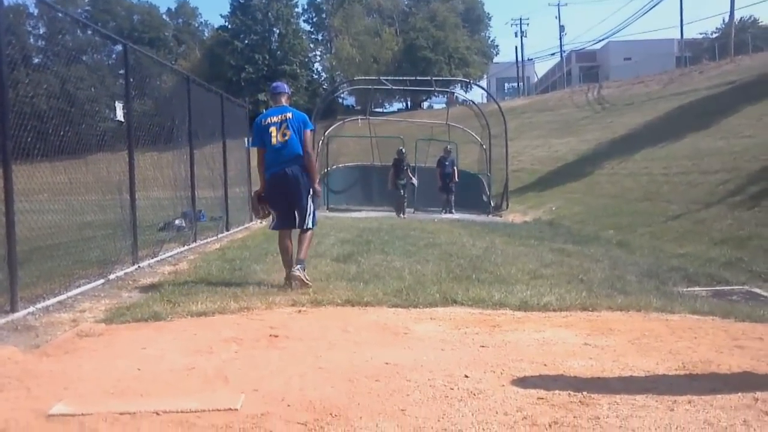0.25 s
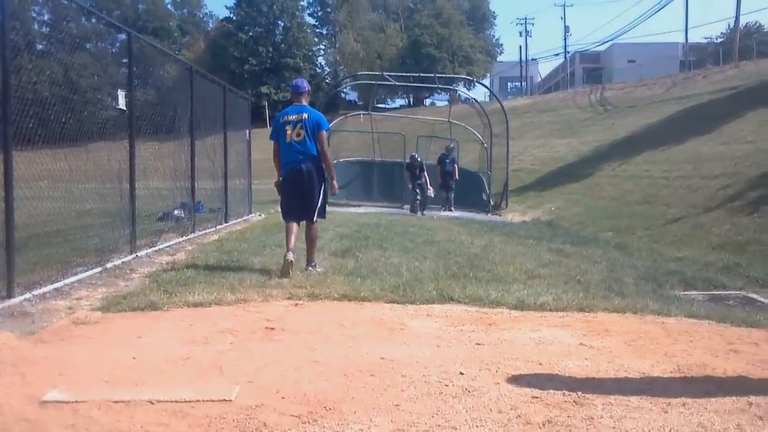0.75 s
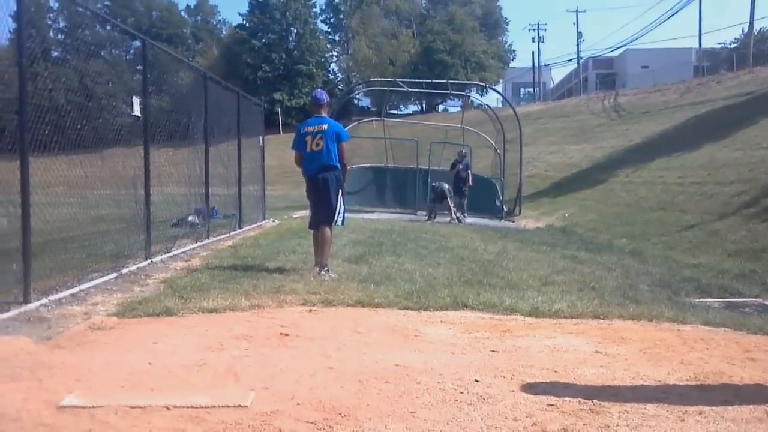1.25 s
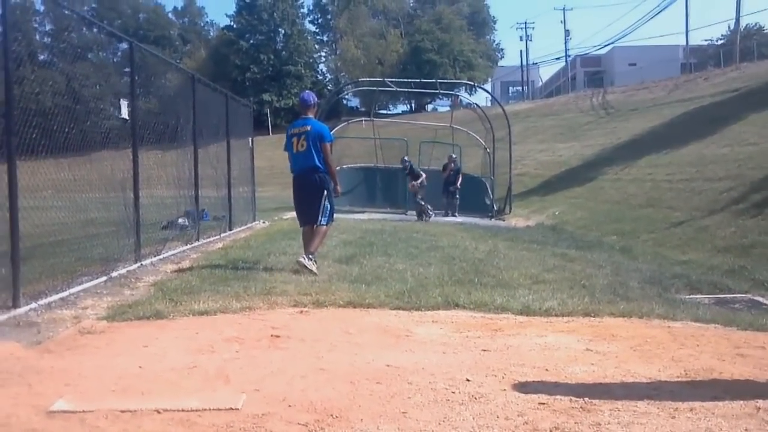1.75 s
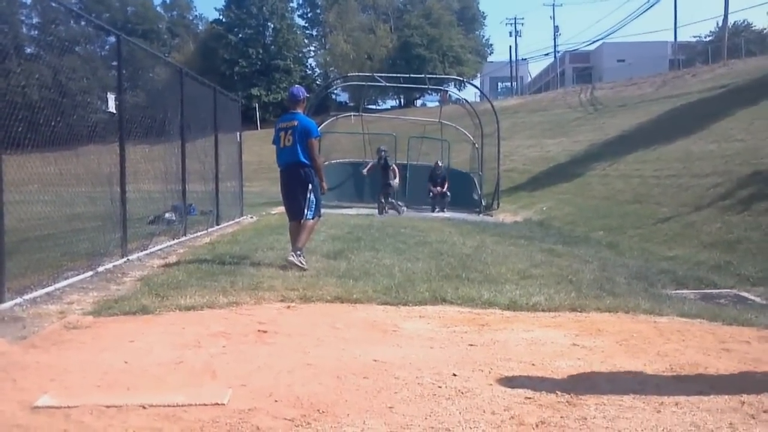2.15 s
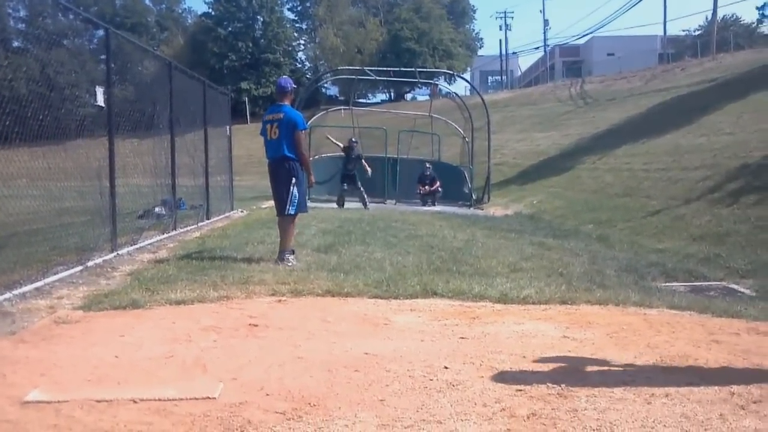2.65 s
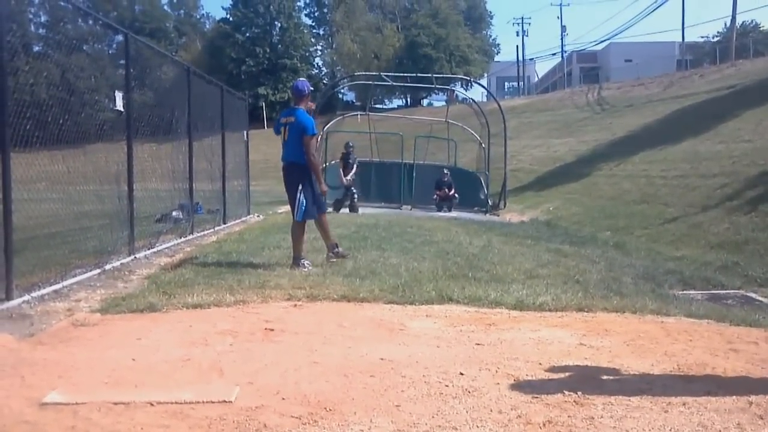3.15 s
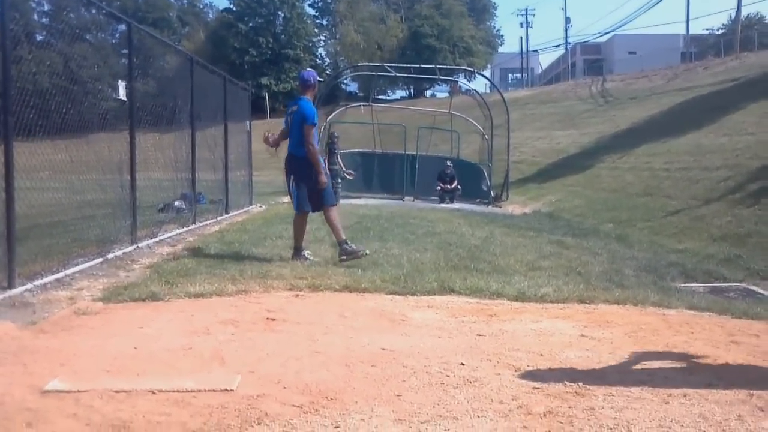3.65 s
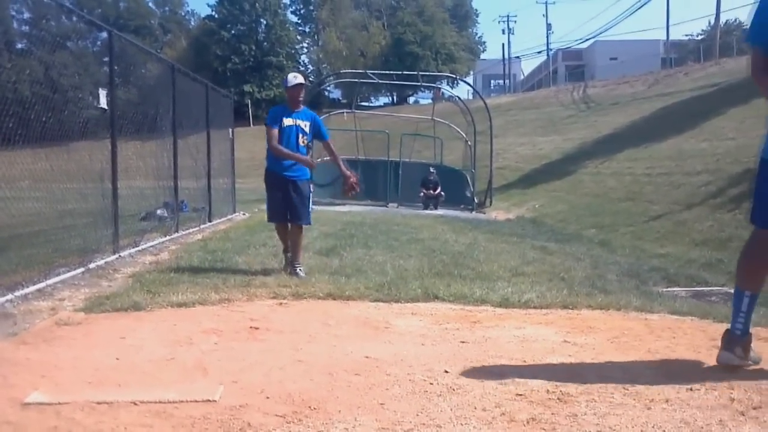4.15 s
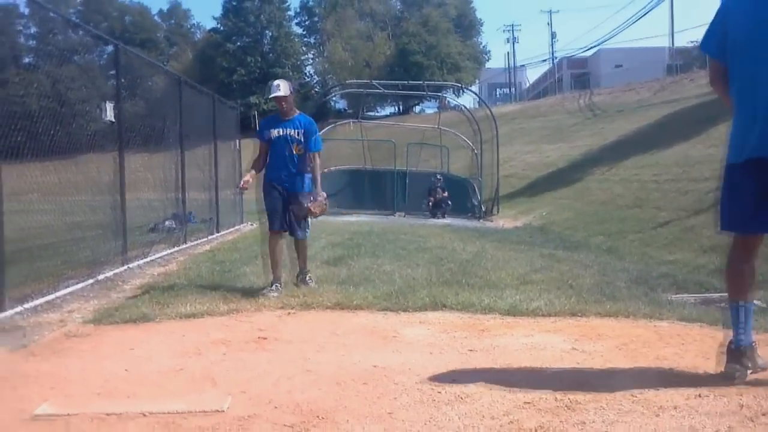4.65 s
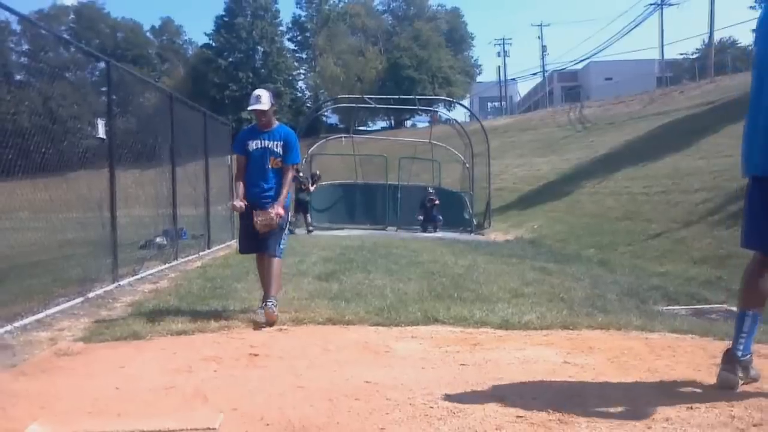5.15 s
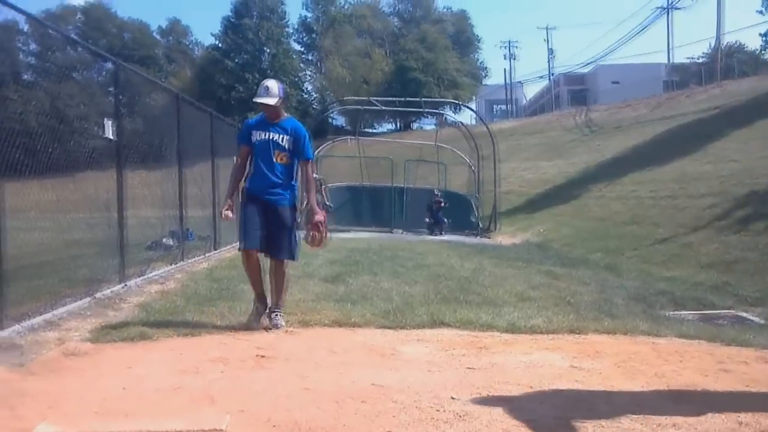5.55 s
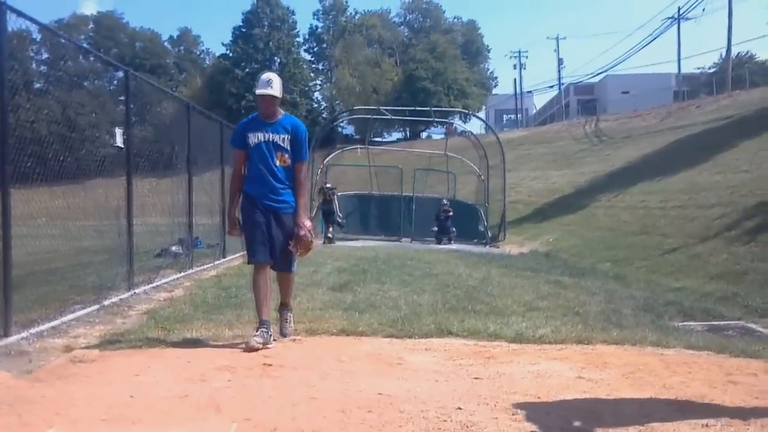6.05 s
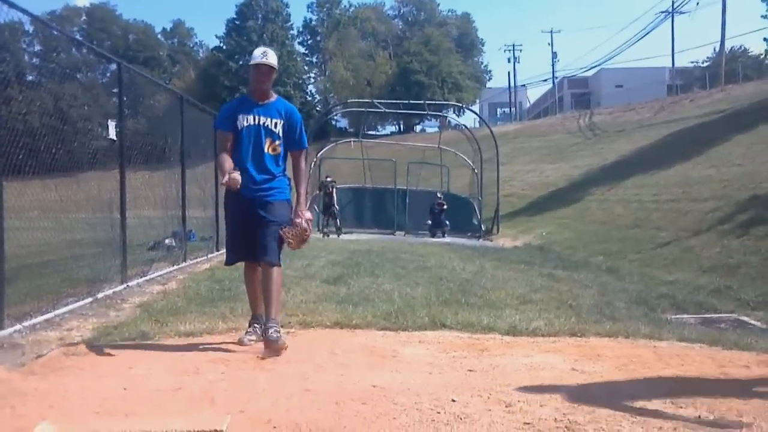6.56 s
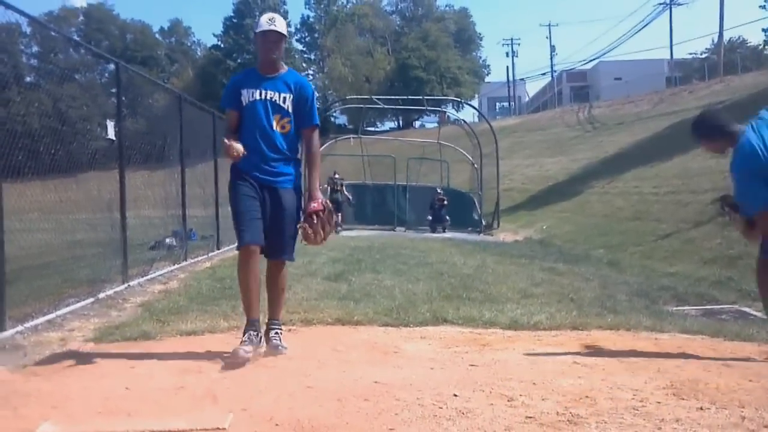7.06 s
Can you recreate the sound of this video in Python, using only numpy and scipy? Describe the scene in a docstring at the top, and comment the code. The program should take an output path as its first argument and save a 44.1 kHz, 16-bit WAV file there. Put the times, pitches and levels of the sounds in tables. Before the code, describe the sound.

Close footsteps crunch and drag across a sandy dirt mound, ending in one sharp stomp, with soft hum, thin crickets and light wind outdoors.

```python
"""A ball-field mound of dry dirt: shoes step and scuff close to a small camera.
Grains cracking at random ring through resonances and filters as steps and drags; single pebbles tick.
Further off, two crickets chirp as gated tones; a machine hums and drones; traffic murmurs; noise gives
a far wash of traffic and leaves. Light wind, low filtered noise, brushes the camera.
Its two close microphone ports are subtracted from each other to widen the stereo."""
import sys
import numpy as np
from scipy import signal
from scipy.fft import rfft, irfft, next_fast_len
from scipy.io import wavfile
from scipy.ndimage import uniform_filter1d

SR = 44100
rng = np.random.default_rng(int(sys.argv[2]) if len(sys.argv) > 2 else 0)


def wrap_up_sound(samples):
    """Save the sound to the file named by the first command line argument, as 16-bit audio."""
    columns = np.atleast_2d(samples).T
    # keep every value between -1 and 1, then stretch to whole-number steps
    tamed = np.clip(columns, -1, 1)
    steps = np.round(tamed * 32767).astype(np.int16)
    wavfile.write(sys.argv[1], SR, steps)


N = 321489  # samples
T = np.arange(N) / SR  # time [s]
# Source levels are set before the ports and the microphone; spectrum tables give only a shape.


def gain_of(db):
    """Decibels to gain."""
    return 10 ** (np.asarray(db) / 20)


def evened(x):
    """Scales to rms 1."""
    return x / np.sqrt(np.mean(x ** 2) + 1e-20)


def peaked(x, db):
    """Scales a sound to a peak level."""
    return gain_of(db) * x / abs(x).max()


def read(points, hz, order=1):
    """Reads a column of a spectrum table on a log-frequency axis."""
    table = np.transpose(points)
    return np.interp(np.log(hz + 1), np.log(table[0] + 1), table[order])


def level_over_time(rows):
    """The level of a time table, at every sample."""
    times, levels = np.transpose(rows)
    return np.interp(T, times, levels)


def colour(x, points):
    """Causal minimum-phase filter with the given spectrum and an impulse of energy 1."""
    hz = abs(np.fft.fftfreq(8192, 1 / SR))
    log_gain = np.log(gain_of(read(points, hz)))
    taps = np.fft.ifft(np.exp(np.conj(signal.hilbert(log_gain)))).real[:4096]
    return signal.oaconvolve(x, taps / np.linalg.norm(taps))[:len(x)]


def resonate(x, hz, width):
    """A resonance, width in Hz, that can follow a moving pitch: shift to 0 Hz, smooth, shift back."""
    turn = np.exp(2j * np.pi * np.cumsum(hz * np.ones(len(x))) / SR)
    r = np.exp(-np.pi * width / SR)
    smoothed = signal.lfilter([1 - r], [1, -r], x / turn)
    return 2 * (turn * smoothed).real


def wander(seconds):
    """Slow chance of rms 1: noise averaged twice over the given time."""
    size = max(round(seconds * SR), 1)
    once = uniform_filter1d(rng.standard_normal(N), size)
    return evened(uniform_filter1d(once, size))


def grit(length, per_s, spread_db):
    """Grains that crack at random moments, a few much larger than the rest."""
    draw = rng.random((length, 3))
    size = gain_of(spread_db * np.minimum(-np.log(draw[:, 0] + 1e-9), 3))
    sign = np.sign(draw[:, 1] - .5)
    return size * sign * (draw[:, 2] < per_s / SR)


def swell(start, top, end, point):
    """A smooth rise to 1 and fall back to silence, its three times sorted first; point sharpens the top."""
    ramp = np.interp(T, np.sort([start, top, end]), [0, 1, 0])
    return np.sin(np.pi / 2 * ramp) ** point


# Footfalls and the crunches within them, close by: (time [s], knock pitch [Hz], knock peak [dB],
# crunch peak [dB], thud peak [dB], treble peak [dB], contact [ms])
STEPS = [(0.248, 1810, -46, -38, -63, -53, 4.7), (0.775, 616, -40, -41, -46, -49, 8.9),
         (1.117, 1330, -43, -39.5, -40.5, -41, 7.3), (1.304, 975, -45, -56, -43, -64, 6),
         (1.465, 660, -42.5, -32.5, -44, -43, 7), (2.099, 553, -47, -49, -49, -69, 6.6),
         (2.241, 620, -37, -34.5, -42, -38, 12), (2.293, 520, -46.5, -50, -55, -62, 13),
         (2.464, 630, -55, -55, -44, -54, 6), (2.737, 610, -43.5, -44, -44, -47, 11),
         (3.057, 960, -34.5, -21, -30, -26, 3.5), (3.14, 1500, -52, -45, -60, -49, 4),
         (3.167, 800, -51, -45, -57, -47, 5), (3.197, 666, -38.5, -33.5, -32, -50, 7.5),
         (3.336, 690, -44, -49, -47, -58, 4.6), (3.377, 1230, -42, -42, -63, -48, 6.7),
         (3.395, 1570, -41, -28, -70, -38.5, 3.2), (3.454, 1080, -42, -49, -60, -57, 5.2),
         (3.505, 1450, -51, -41, -61, -52, 6), (3.73, 1457, -38, -32, -50.5, -43.5, 3),
         (3.742, 1300, -38, -40, -48, -46, 2.8), (3.759, 1100, -40, -35, -43, -44, 2.7),
         (3.767, 1996, -39, -42, -36.5, -32, 5), (3.799, 940, -49, -27, -29, -33.5, 4.7),
         (3.803, 990, -35, -25, -42, -38, 2.3), (3.818, 1200, -40, -28, -42, -34, 4.9),
         (3.829, 1210, -33, -46, -32, -48, 5.1), (3.849, 670, -41, -33, -39, -52, 16),
         (3.859, 905, -44, -39, -37, -44, 3.6), (3.916, 1190, -40, -39, -55, -48, 7.8),
         (3.974, 1020, -40, -46, -46, -55, 2.8), (3.996, 690, -40, -51, -40.5, -46, 4.6),
         (4.023, 920, -38, -46, -42, -46, 5.2), (4.049, 840, -36, -50, -43, -44, 3.7),
         (4.064, 860, -36.5, -50, -50, -55, 3), (4.089, 810, -38, -54, -37, -58, 2.2),
         (4.111, 900, -45, -48, -40, -58, 2.6), (4.174, 746, -40, -52, -42.5, -57.5, 5.5),
         (4.283, 680, -45, -59, -46, -60, 6.6), (4.519, 780, -39, -55, -54, -64, 4),
         (4.531, 890, -39, -42, -58, -61, 3), (4.551, 829, -38, -44, -48, -61, 4.9),
         (4.666, 676, -45, -47, -57, -64, 5), (4.679, 680, -48, -46, -35, -60, 7.9),
         (5.018, 1140, -39, -55, -58, -62, 3), (5.03, 1140, -31.5, -46, -46, -58, 4),
         (5.041, 1150, -37, -48, -58, -58, 3), (5.053, 1150, -36, -49, -48, -59, 2.7),
         (5.3, 900, -35, -31, -64, -41.5, 3.3), (5.31, 885, -35, -51, -48, -51, 2.4),
         (5.325, 930, -25.5, -30, -56, -42, 3.4), (5.344, 900, -42, -48, -58, -55, 3),
         (5.387, 1040, -45, -57, -52, -52, 6.8), (5.798, 730, -37.5, -45, -37, -46, 2.6),
         (5.826, 910, -37, -50, -46, -42, 5.8), (6.037, 1400, -42, -53, -53, -47, 6),
         (6.271, 1610, -51, -34.5, -62, -45, 12), (6.313, 1230, -30.5, -26, -40, -52, 9.6),
         (6.339, 1190, -31, -31, -37, -53, 6), (6.352, 1265, -36, -23, -43, -37, 4.8),
         (6.288, 1400, -45, -29, -52, -42, 3.6), (6.362, 1200, -35, -33, -42, -31, 6),
         (6.374, 1300, -40, -36, -44, -40, 4.6), (6.456, 1410, -44, -25, -33, -34, 7.2),
         (6.528, 810, -41, -62, -24, -70, 4.2), (6.582, 800, -46, -49, -53, -55, 4.7),
         (6.637, 1100, -42, -31, -50, -44, 4), (6.65, 1000, -51, -47, -52, -38, 3),
         (6.661, 1000, -42, -40, -51, -43, 3), (6.668, 900, -44, -42, -50, -44, 3),
         (6.816, 1820, -35, -29, -63, -49, 2.4), (6.951, 1113, -41, -37.5, -62, -50, 5),
         (6.98, 1130, -44, -40, -55, -49, 4.7), (6.993, 1040, -42, -37.5, -41, -55, 5.5),
         (7.16, 1078, -24, -22.5, -17.5, -20, 5.6)]
# Shoe on packed dirt: (multiple of the thud pitch, width [Hz], level [dB])
SOLE = [(1, 133, 7), (1.85, 200, -3), (.27, 70, -11)]
THUD_HZ = 343
# Crunching grit: (frequency [Hz], level [dB per Hz])
CRUNCH = [(120, -58.5), (250, 0.5), (400, 4), (650, -2), (1000, -1), (1500, 3), (2300, -0.5), (3000, -14.5),
          (4500, -31), (8800, -42)]
# Fine grit: (frequency [Hz], level [dB per Hz])
FINE = [(1500, -39), (2600, 3.5), (3500, 8.5), (4800, -4), (7000, -36.5)]
# Loose sand and pebbles: (frequency [Hz], level [dB per Hz])
SAND = [(2000, -31), (4500, 4.5), (6200, 7.5), (8800, 1.5), (11500, -2.5), (13500, -9), (14500, -43)]


def steps():
    """A first crack and a clump of grit under each sole: it knocks, crunches, thuds and spits treble."""
    out, t = np.zeros(N + 5000), np.arange(5000) / SR
    low_cut = signal.butter(2, 170, "high", fs=SR)
    for s, hz, knock_db, crunch_db, thud_db, treble_db, contact_ms in STEPS:
        release = np.exp(-1000 * t / max(contact_ms, 1)) + 0.11 * np.exp(-t / 0.02)
        press = (1 - np.exp(-t / 0.00064)) * release
        first_crack = 3.35 * signal.unit_impulse(len(t), 20)
        cracks = grit(len(t), per_s=5000, spread_db=2.5) * press + first_crack
        knock = resonate(resonate(cracks, hz, 280), hz, 700)
        # the weight of the foot
        push = signal.lfilter(*low_cut, press * np.exp(-t / 0.00046) + 0.53 * cracks)
        thud = 0
        for multiple, width, db in SOLE:
            mode_hz = multiple * THUD_HZ
            mode = resonate(resonate(push, mode_hz, width), mode_hz, width)
            thud = thud + gain_of(db) * evened(mode)
        spit = cracks * np.exp(-t / 0.093)
        spit = evened(colour(spit, FINE)) + 0.42 * evened(colour(spit, SAND))
        sound = peaked(knock, knock_db) + peaked(colour(cracks, CRUNCH), crunch_db)
        sound = sound + peaked(thud, thud_db) + peaked(spit, treble_db)
        out[round(s * SR):][:len(t)] += sound
    return out[:N]


# Soles dragging, close by: (start [s], hardest [s], end [s], crunch level [dB], rub level [dB],
# fine grit level [dB], sand hiss level [dB], pitch of the rub [Hz]);
# the three times are sorted when played
DRAG = [(1.107, 1.125, 1.153, -57, -53, -61, -73, 1280), (1.455, 1.467, 1.506, -55, -48, -57, -76, 1300),
        (2.23, 2.253, 2.3, -55, -57, -64, -73, 624), (2.734, 2.752, 2.79, -57, -54, -66, -76, 614),
        (3.053, 3.08, 3.14, -60, -52, -60, -62, 560), (3.169, 3.192, 3.25, -47, -49.5, -53, -63, 834),
        (3.369, 3.386, 3.402, -53, -48.5, -62, -74, 1220), (3.297, 3.45, 4.15, -57, -61, -61, -60, 1090),
        (3.689, 3.772, 3.82, -43, -45.5, -51.5, -62, 1284),
        (3.77, 3.835, 3.89, -41.5, -41, -49.5, -54, 890), (3.858, 4.02, 4.29, -53.5, -52.5, -59, -55, 780),
        (4.271, 4.286, 4.33, -61, -55, -69, -73, 654), (4.515, 4.54, 4.6, -60, -56, -74, -64, 770),
        (4.658, 4.688, 4.725, -48, -46, -76, -76, 735), (5.018, 5.042, 5.1, -60, -51, -63, -77, 1110),
        (5.305, 5.33, 5.365, -56, -48, -58, -59, 895), (5.793, 5.83, 5.92, -51.5, -51, -57, -61, 895),
        (5.998, 6.104, 6.15, -53.5, -50.5, -64.5, -64, 652), (6.16, 6.207, 6.24, -52.5, -56, -66, -66, 412),
        (6.261, 6.303, 6.335, -40.5, -44, -49, -60, 1410),
        (6.322, 6.364, 6.41, -40.5, -41.5, -45.5, -51, 1190),
        (6.383, 6.457, 6.53, -47.5, -49.5, -53.5, -59.5, 910),
        (6.538, 6.679, 6.75, -49.5, -47, -54.5, -57, 730), (6.535, 6.556, 6.6, -56, -56, -59, -52.5, 800),
        (6.619, 6.655, 6.69, -51, -58, -54, -78, 1160), (6.77, 6.833, 6.92, -56, -47.5, -58.5, -64, 1192),
        (6.955, 7.015, 7.04, -61, -59, -55, -59, 1046),
        (7.157, 7.149, 7.32, -50.5, -51.5, -55.5, -57.5, 660)]
# Crumb sizes: (pitch [multiple of the pitch of the rub])
CRUMBS = [.7, .85, 1, 1.2, 1.5]
DRAG_POINT = 1.37  # higher: each stroke swells to a sharper top


def drag():
    """Grit rolls under the sole in clumps, crumbs of many sizes pop, the sole rubs; loose sand hisses."""
    rows = np.array(DRAG)
    press = np.array([swell(*row[:3], DRAG_POINT) for row in rows])
    crunch_gain, rub_gain, fine_gain, sand_gain = gain_of(rows[:, 3:7]).T @ press
    strongest = np.argmax(press * gain_of(rows[:, 4:5]), axis=0)
    centre_hz = rows[strongest, 7]  # the strongest stroke sets the pitch
    clumps = gain_of(3.0 * wander(0.004))
    cracks = grit(N, per_s=3000, spread_db=2.0) * clumps
    crumbs = 0
    for multiple in CRUMBS:
        pops = grit(N, per_s=600, spread_db=3.0) * clumps
        crumbs = crumbs + evened(resonate(pops, multiple * centre_hz, 130 * multiple))
    rub = resonate(resonate(cracks, centre_hz, 250), centre_hz, 260)
    rub = evened(evened(crumbs) + 0.4 * evened(rub))
    spray = grit(N, per_s=12000, spread_db=5.0)
    crunch = evened(colour(cracks, CRUNCH))
    fine = evened(colour(0.39 * spray + 1.25 * cracks, FINE))
    sand = evened(colour(spray + .2 * cracks, SAND))
    return crunch_gain * crunch + rub_gain * rub + fine_gain * fine + sand_gain * sand


# Single pebbles, close by: (time [s], peak level [dB])
TICKS = [(1.204, -39.5), (2.37, -48), (2.482, -34), (5.1316, -38), (5.8444, -38.5), (6.0741, -43),
         (6.1227, -42), (6.3634, -37), (6.552, -40), (6.695, -44), (7.1587, -16)]


def ticks():
    """Small stones snap: a noise burst with a bright click and a short rattle."""
    out, t = np.zeros(N + 1500), np.arange(1500) / SR
    for s, db in TICKS:
        fade = np.exp(-t / 0.0006) + 0.19 * np.exp(-t / 0.011)
        snap = rng.standard_normal(len(t)) * fade
        out[round(s * SR):][:len(t)] += peaked(colour(snap, SAND), db)
    return out[:N]


# Beats of the two crickets in the grass: (chirps per second, part of a beat gone at the start)
HIGH_BEAT = 18.622, .07
LOW_BEAT = 15.86, .19
HIGH_HZ, LOW_HZ = 8309, 7490
CHIRP_SHARE = .42  # part of each beat that sounds


def cricket(hz, beat, db, waver_hz, uneven_db, fall_hz):
    """Short pure chirps at an even beat, each sagging in pitch and a little uneven; the left port faces them."""
    rate, offset = beat
    phase = (rate * T + offset + .5) % 1 - .5
    gate = np.cos(np.pi * np.clip(phase / CHIRP_SHARE, -.5, .5)) ** 2
    sag = fall_hz * np.clip(2 * phase / CHIRP_SHARE, 0, 1) ** 2
    pitch = hz - sag + waver_hz * wander(0.00676)
    tone = np.sin(2 * np.pi * np.cumsum(pitch) / SR)
    return gain_of(db + uneven_db * wander(0.0094)) * gate * tone * np.array([[1], [.15]])


# Far machine: (time [s], level [dB])
HUM = [(0.0, -73), (0.3, -60), (0.75, -66), (1.2, -61.5), (2.2, -65.5), (2.88, -59.5), (3.8, -55),
       (4.45, -52), (5.3, -53), (6.2, -55.5), (7.0, -51.5), (7.29, -55)]
HUM_HZ = 178.5


def hum():
    """One low tone of a far machine, its pitch and level slightly unsteady."""
    pitch = HUM_HZ + 0.37 * wander(0.093)
    tone = np.sqrt(2) * np.sin(2 * np.pi * np.cumsum(pitch) / SR)
    return gain_of(level_over_time(HUM) + 0.51 * wander(0.025)) * tone


# Fuzzy drone: (time [s], level [dB] before a cut of 3 dB)
DRONE = [(0, -68), (.5, -62.5), (3.5, -60.5), (4.3, -66.5), (7.29, -63.5)]


def drone():
    """A fuzzy drone below the hum, noise in a narrow resonance, stronger in the left port."""
    fuzz = evened(resonate(rng.standard_normal(N), 126.8, 15))
    return gain_of(level_over_time(DRONE) - 3.0) * fuzz * np.array([[1.15], [.85]])


# A low band of traffic swells once: (start [s], top [s], end [s], level [dB], pitch [Hz], width [Hz]);
# the three times are sorted when played
MURMUR = (2.05, 2, 3.5, -60.5, 455, 116)


def murmur():
    """A fuzzy low band of traffic, noise through two resonances, that swells and fades."""
    start, top, end, db, hz, width = MURMUR
    band = resonate(resonate(rng.standard_normal(N), hz, width), hz, width)
    return gain_of(db + 2.0 * wander(0.086)) * swell(start, top, end, point=0.99) * evened(band)


# Gusts at the camera over a steady breeze: (start [s], top [s], end [s], level [dB]);
# the three times are sorted when played
GUSTS = [(1.154, 1.202, 1.3, -66), (1.74, 1.8, 1.7, -78), (3.45, 3.57, 3.1, -62), (3.843, 4.025, 4.28, -56),
         (4.22, 4.294, 4.36, -63), (4.496, 4.58, 4.3, -62), (5.591, 5.718, 5.3, -78)]
# Wind before its treble is raised: (frequency [Hz], level [dB per Hz])
WIND = [(20, -29), (50, -8), (80, -5), (130, -2.5), (200, -12), (350, -45), (700, -41.5)]
BREEZE_DB = -71.5


def wind():
    """Lumpy low buffeting, filtered noise, that pushes the left port a little harder."""
    lumps = colour(rng.standard_normal(N) * gain_of(2.2 * wander(0.03)), WIND)
    hz = np.fft.rfftfreq(N, 1 / SR)
    tilted = irfft(rfft(lumps) * np.clip(hz, 40, 800) / 130, N)  # gain rises with frequency
    blowing = gain_of(BREEZE_DB)
    for *times, db in GUSTS:
        blowing = blowing + gain_of(db) * swell(*times, point=1.2)
    fade_in = np.minimum(T / .05, 1)
    return fade_in * blowing * evened(tilted) * np.array([[1.2], [.8]])


# Far traffic and leaves: (frequency [Hz], level [dB per Hz])
AIR = [(25, -12.5), (40, -49.5), (70, -13.5), (110, 0.5), (160, -4.5), (250, -4), (400, -2.5), (650, -8.5),
       (1000, -5), (1500, -7.5), (2100, -11), (3300, -20), (4500, -22), (6200, -22.5), (8000, -17),
       (11500, -29), (13500, -36)]
AIR_DB = -52.5


def air():
    """Far wash of traffic and leaves: noise with drifting patches of colour."""
    frames = N // 256 + 5
    a, b, patches = rng.standard_normal((frames, 513, 3)).T
    patches = uniform_filter1d(patches, 12, 0)  # smooth across frequency, then time
    patches = evened(uniform_filter1d(patches, 14, 1))
    z = (a + 1j * b) * gain_of(1.6 * patches)
    wash = colour(signal.istft(z, nperseg=1024, noverlap=768)[1][:N], AIR)
    return gain_of(AIR_DB + 0.5 * wander(0.17) + 0.28 * wander(0.025)) * evened(wash)


# Difference of the two ports against their sum:
# (frequency [Hz], level [dB], likeness, held within -0.7..0.7 when used)
PORTS = [(41.4, -10, -0.28), (163, -16, -1.1), (246, -15.5, -1.5), (395, -11, -1.44), (630, -4.5, -1.55),
         (1040, -5.5, -1.1), (1520, 2.5, -2), (2070, -1.5, -0.31), (3000, -2.5, 0.72), (4500, -1, 0.77),
         (7900, -1.5, -0.69), (13400, 0.5, 0.38)]
# Sound reaching the right port first: (frequency [Hz], share of the difference)
RIGHT_LEAD = [(120, .05), (300, 0.092), (700, 0.33), (1500, 0.065), (3500, 0.025)]


def ports(x, spread_s, drift_s):
    """Two ports: their likeness varies with frequency as the camera body scatters the sound."""
    size = next_fast_len(N + 8192)
    hz = np.fft.rfftfreq(size, 1 / SR)
    apart = rfft(x, size) * gain_of(read(PORTS, hz))
    likeness = np.clip(read(PORTS, hz, order=2), -.7, .7)
    alike = likeness - 1j * np.clip(read(RIGHT_LEAD, hz), 0, .7)
    scattered = apart * np.sqrt(1 - abs(alike) ** 2)
    paths = []
    for knots in rng.random((2, round(SR * spread_s) + 2)):
        # the delay differs from band to band
        delay = spread_s * (0.33 + np.interp(hz, np.linspace(0, SR / 2, len(knots)), knots))
        late = np.exp(-2j * np.pi * np.cumsum(delay) * hz[1])
        paths.append(irfft(scattered * late, size)[:N])
    turn = np.pi * wander(drift_s)  # the mix of the two scattered paths drifts at random
    apart = irfft(apart * alike, size)[:N] + np.cos(turn) * paths[0] + np.sin(turn) * paths[1]
    return np.array([x + apart, x - apart])


def scene():
    """Feet close by, crickets in the grass, the field far away, wind on the camera."""
    feet = ports(steps() + drag() + ticks(), spread_s=.003, drift_s=0.042)
    insects = cricket(HIGH_HZ, HIGH_BEAT, db=-52.5, waver_hz=18.7, uneven_db=1.5, fall_hz=305)
    insects = insects + cricket(LOW_HZ, LOW_BEAT, db=-55.5, waver_hz=50, uneven_db=1.8, fall_hz=650)
    far = ports(hum() + murmur() + air(), spread_s=.02, drift_s=0.29)
    return feet + insects + far + drone() + wind()


CROSS_DELAY = 17  # samples
EDGE_HZ = 14150  # upper band limit


def record(dry):
    """The microphone: each port minus the other delayed, a bass lift, a little feedback, a band limit."""
    wide = dry - 1.003 * np.roll(dry[::-1], CROSS_DELAY, axis=1)
    size = next_fast_len(N + 8192)
    hz = np.fft.rfftfreq(size, 1 / SR)
    # the bass lift makes up for the subtraction
    lift = .5 + SR / (2 * np.pi * CROSS_DELAY) / (1j * hz + 40)
    # part of the treble goes round again, which narrows the notches of the subtraction
    again = .35 * hz / (hz + 600) * np.exp(-2j * np.pi * hz * CROSS_DELAY / SR)
    lifted = irfft(rfft(wide, size) * lift / (1 - again), size)[:, :N]
    band_limit = signal.firwin(511, EDGE_HZ, window=("kaiser", 9), fs=SR)
    return signal.oaconvolve(lifted, band_limit[None], "same")


dry = scene()
out = record(dry)
wrap_up_sound(out)
```